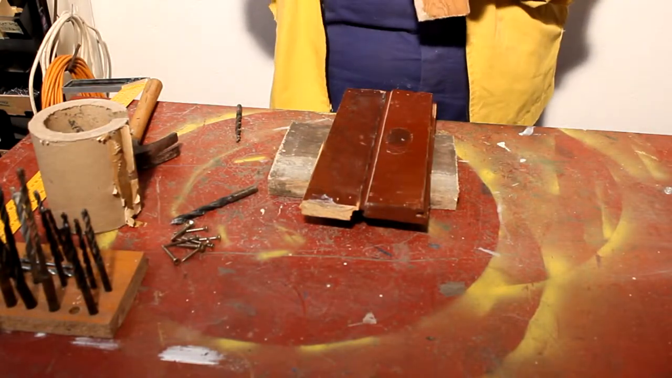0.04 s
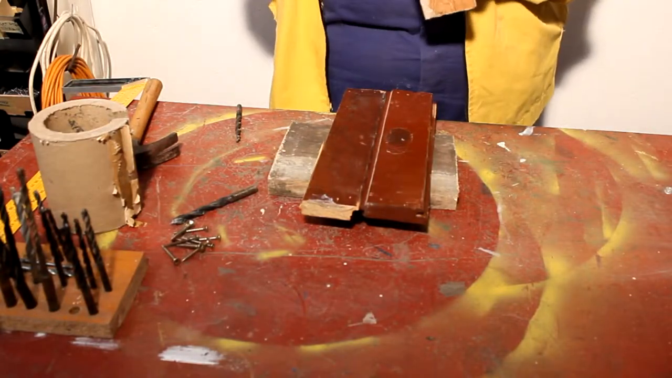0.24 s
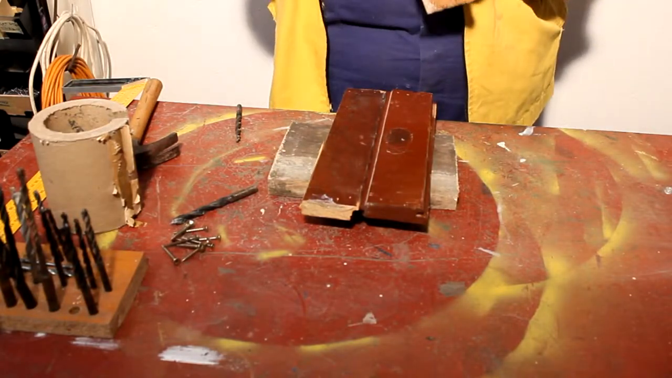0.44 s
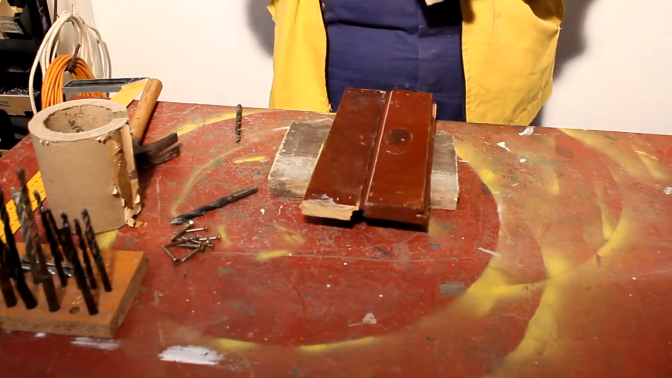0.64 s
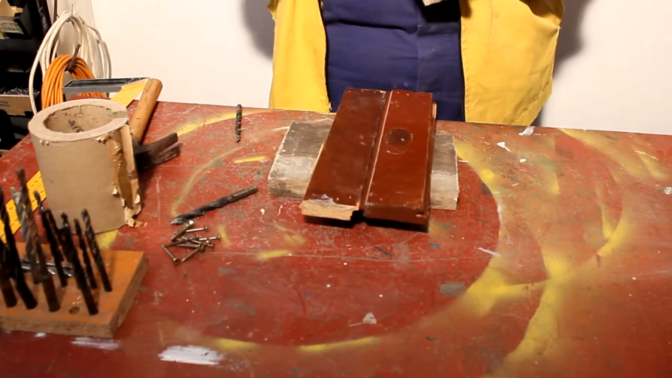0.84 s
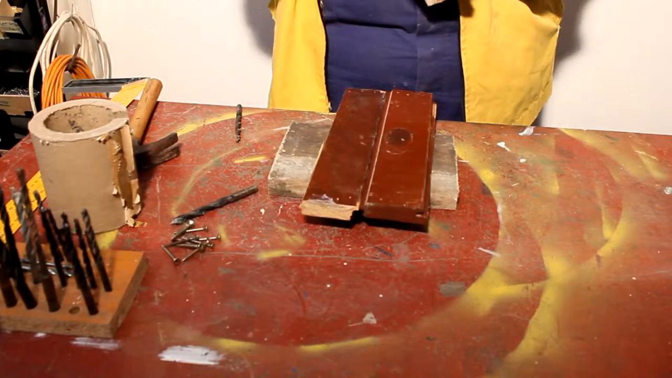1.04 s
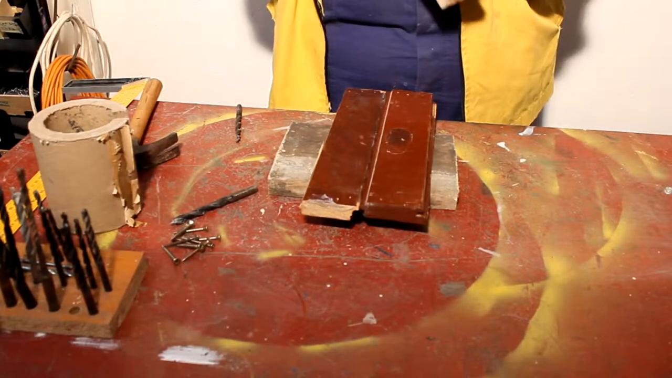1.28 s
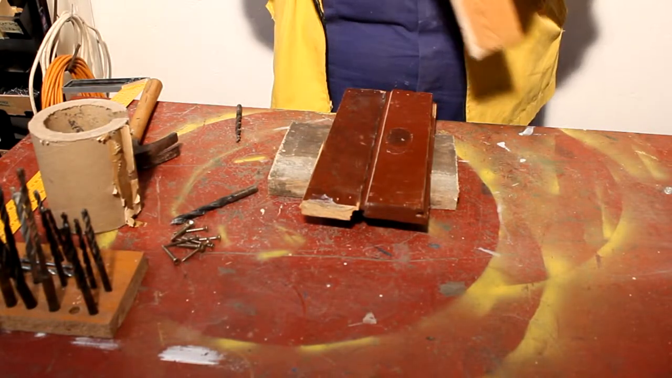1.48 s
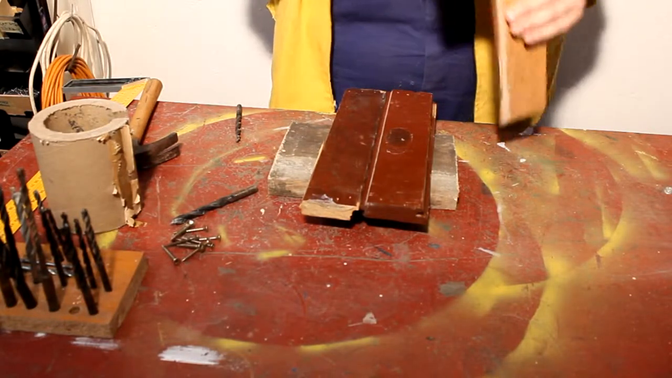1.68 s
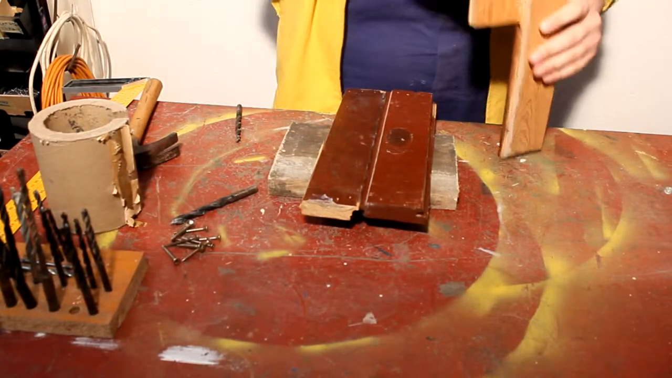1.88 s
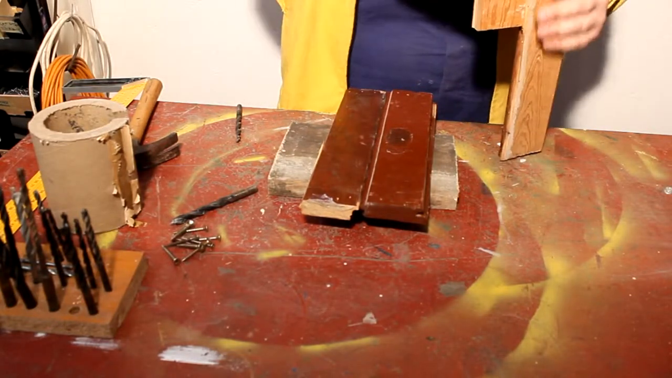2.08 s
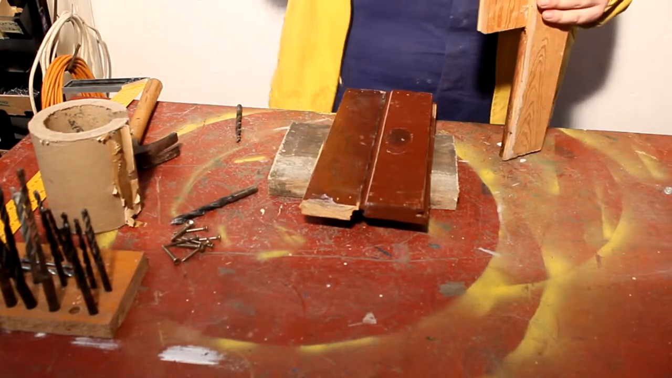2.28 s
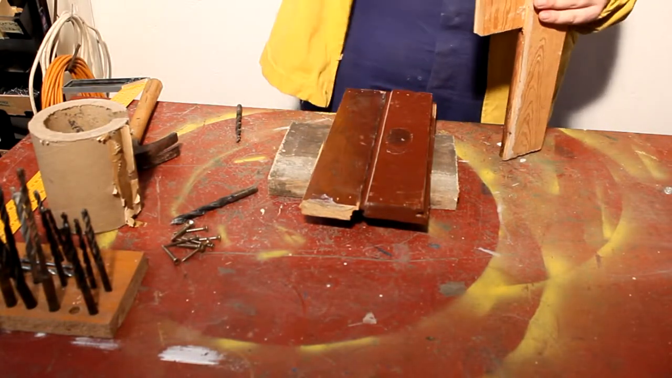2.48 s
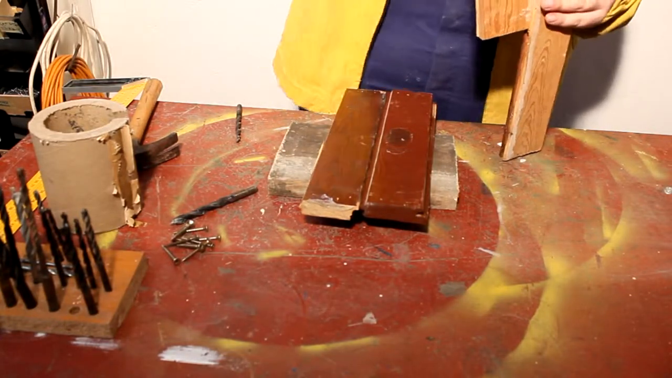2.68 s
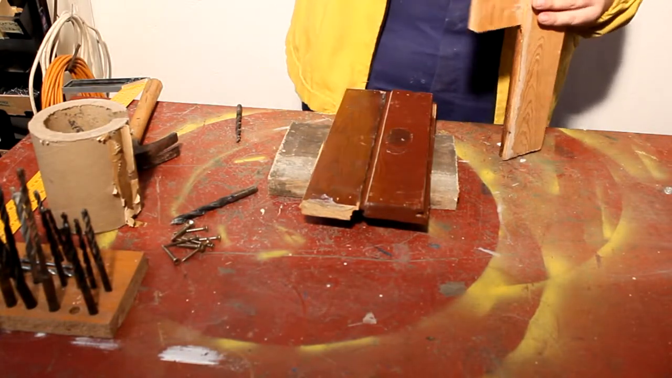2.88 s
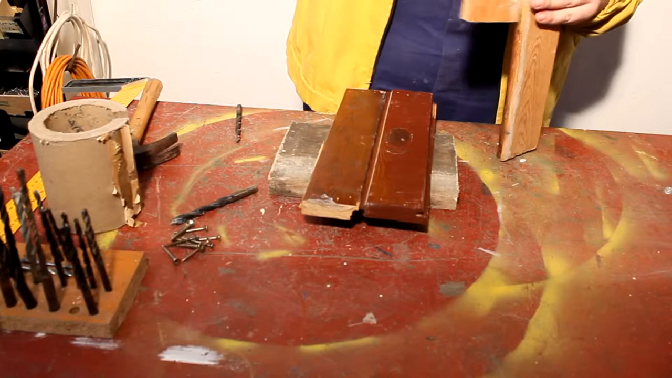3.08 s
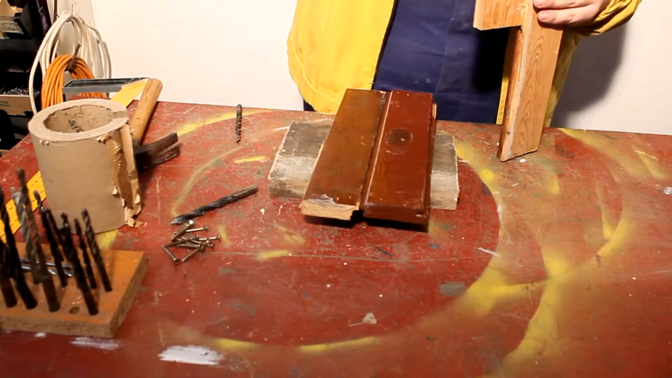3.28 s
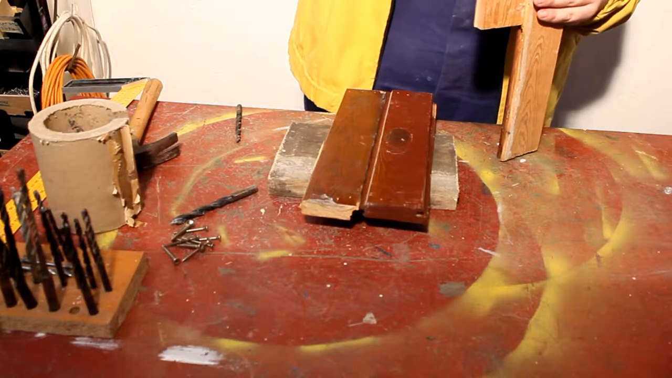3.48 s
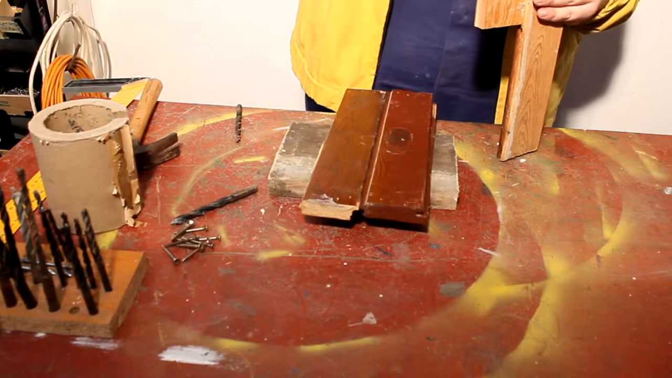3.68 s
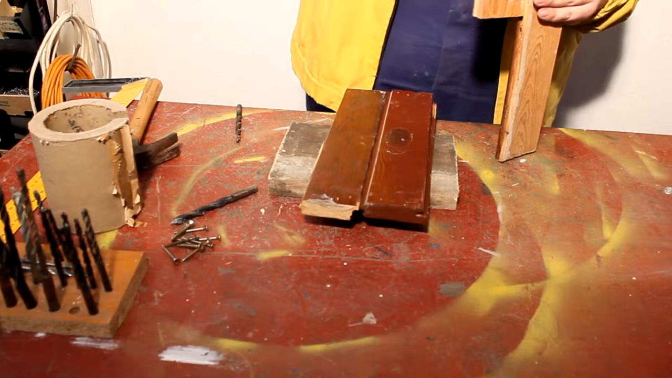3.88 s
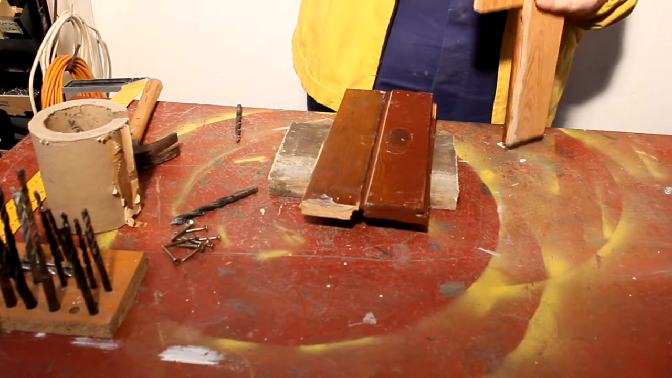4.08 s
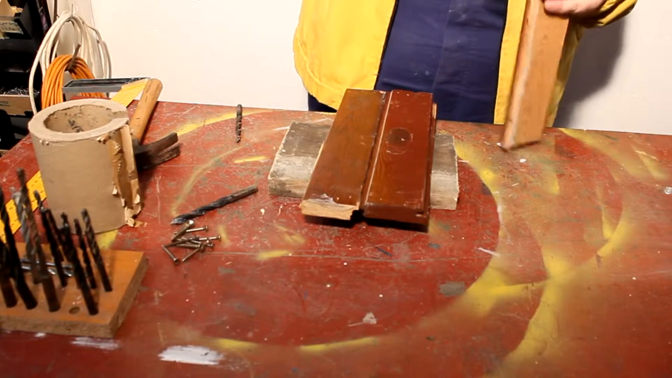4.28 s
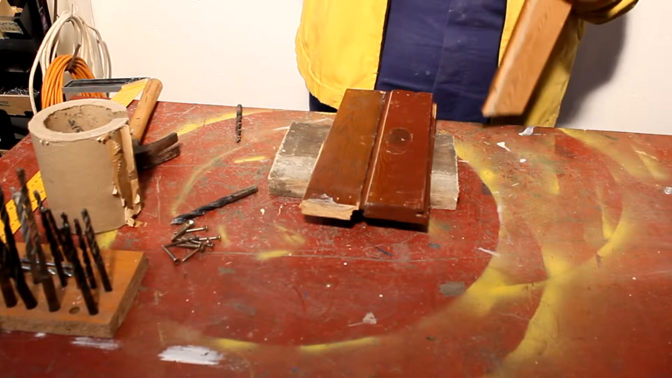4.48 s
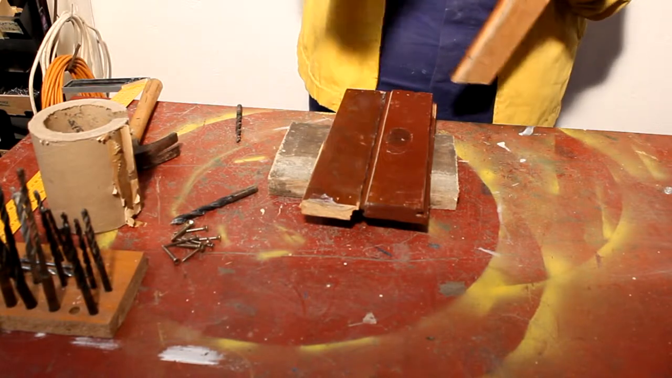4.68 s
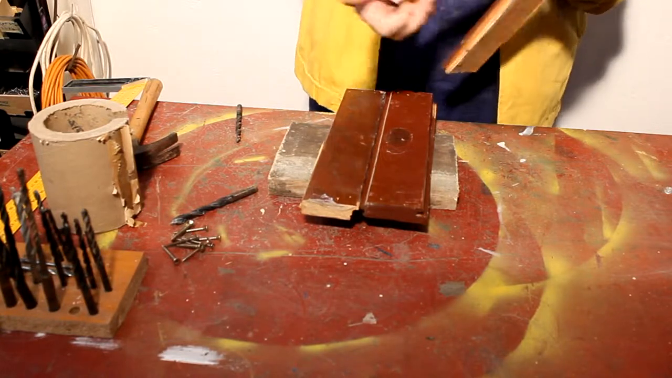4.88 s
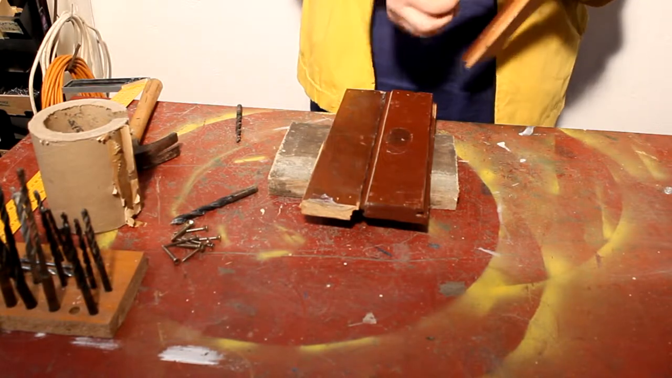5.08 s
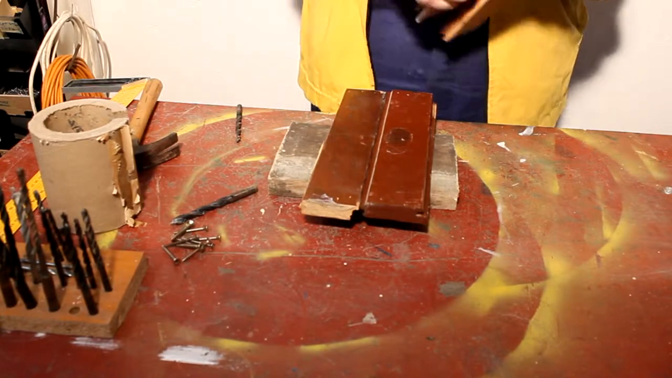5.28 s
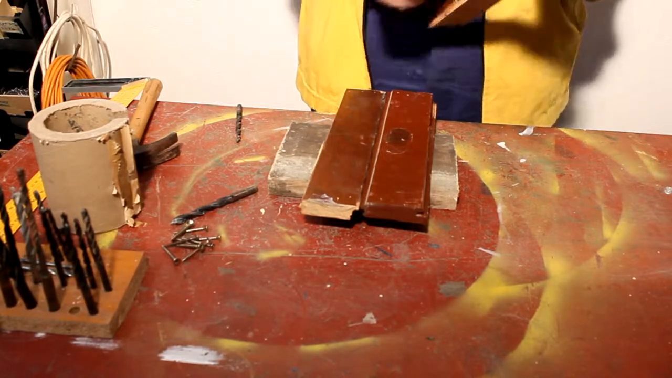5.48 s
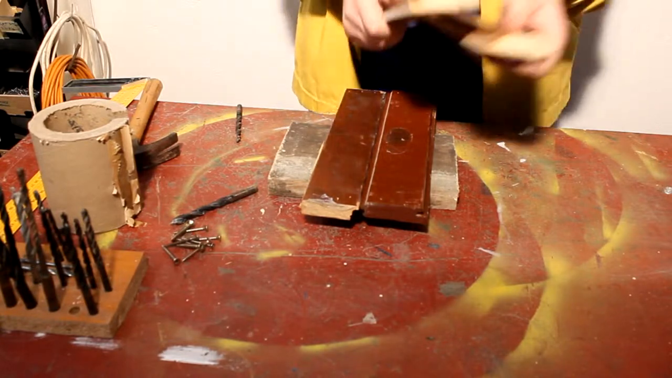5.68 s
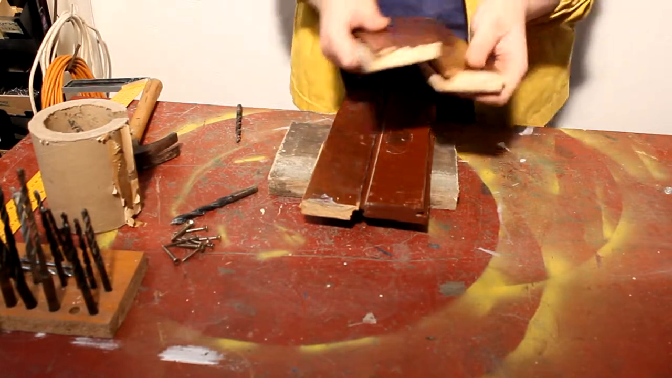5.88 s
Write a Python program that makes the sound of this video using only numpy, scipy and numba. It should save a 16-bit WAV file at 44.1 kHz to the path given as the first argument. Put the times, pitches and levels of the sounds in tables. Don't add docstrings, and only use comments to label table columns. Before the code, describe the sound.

A small, hard, reverberant workshop heard through a camera microphone with quiet room hiss and a faint high whine. From 0 to 0.7 s two narrow boards rub in short, gritty stick-slip scrapes, strongest near 0.55 s. Light edge taps and tiny bumps follow at 0.9-1.4 s, with stiff jacket rustle from 1.3 s. At 2.0 s a board end strikes the bench: a very loud, clipped bang, booming top, rattling loose tools and a room tail. From 2.6 to 3.4 s come clustered wooden clicks, short rubs and dull bumps, growing heavier towards 3.2-3.4 s. Two more hard blows land at 3.9 and 4.27 s, the first with little rattle, the second shaking tools and leaving a thin high steel ring. A lesser knock at 4.83 s leads into light rubbing, ticks and rustle; from 5.5 s a far machine swells in, under crisp knocks around 5.8 s.

```python
import sys
import numpy as np
from scipy import signal
from scipy.fft import rfft, irfft
from scipy.io import wavfile
from scipy.ndimage import uniform_filter1d
from numba import njit

SR = 44100
rng = np.random.default_rng(int(sys.argv[2]) if len(sys.argv) > 2 else 0)


def wav_out(sig):
    wavfile.write(sys.argv[1], SR, np.round(np.clip(np.atleast_2d(sig).T, -1, 1) * 32767).astype(np.int16))


def ratio_of_db(decibels):
    return 10 ** (np.asarray(decibels, float) / 20)


N = 262042
TIME = np.arange(N) / SR


def unit(x):
    return x / np.sqrt(np.mean(x ** 2))


def colour(x, points):
    hz, db = np.transpose(points)
    bin_hz = np.arange(1025) * SR / 2048 + 1
    log_gain = np.interp(np.log(bin_hz), np.log(hz), db) * np.log(10) / 20
    cepstrum = irfft(log_gain)
    cepstrum[1:1024] *= 2
    cepstrum[1025:] = 0
    return signal.fftconvolve(x, irfft(np.exp(rfft(cepstrum))))[:len(x)]


def walk(rate):
    hold = int(SR / rate)
    levels = np.repeat(rng.standard_normal(N // hold + 1), hold)
    return unit(uniform_filter1d(levels, hold)[:N])


def ring(modes, spread_db, detune, length=8192):
    hz, db, t60 = np.transpose(modes)[:, :, None]
    chance = rng.standard_normal((2, len(modes), 1))
    t = TIME[:length]
    decay = ratio_of_db(db + spread_db * chance[0] - 60 * t / t60)
    return decay * np.sin(2 * np.pi * hz * (1 + detune * chance[1]) * t)


def add(out, s, x):
    i = int(s * SR)
    out[i:i + len(x)] += x[:N - i]


def grains(rate, spread_db):
    hits = rng.random(N) < rate / SR
    return unit(hits * rng.standard_normal(N) * ratio_of_db(spread_db * rng.exponential(size=N)))


def strokes(rows, touch_db_per_s):
    lift_db, lift_s, fade_db_per_s = 12.5, 0.019, 176.5
    s, length, db, swell_db = np.transpose(rows)[:4, :, None]
    t = TIME[::64] - s
    after = np.clip(t - length, 0, None)
    swell = swell_db * np.clip(1 - t / length, 0, 1)
    touch = touch_db_per_s * np.clip(t, None, 0)
    return db - swell + touch - lift_db * np.clip(after / lift_s, 0, 1) - fade_db_per_s * after


# (frequency [Hz], density [dB per Hz])
FLOOR_SPECTRUM = [(15, -34), (25, -20), (180, -8.5), (249, -5), (516, -3.5), (911, -11), (1130, -6),
                  (2050, -11.5), (4740, -13.5), (11000, -23.5), (14400, -21.5), (16000, -35)]
# (frequency [Hz], level [dB])
MACHINE_TONES = [(64.6, -55), (134.6, -52), (807.5, -46), (1416, -54), (1637, -48)]
# (time [s], level [dB])
MACHINE_SWELL = [
    (4.9, -17),
    (5.35, -16),
    (5.55, -4),
    (5.94, 2),
]


def background():
    floor_db, whine_hz, whine_width_hz, whine_db = -55, 14160, 350, -68
    hiss = ratio_of_db(floor_db + 0.65 * walk(1.7)) * unit(colour(rng.standard_normal(N), FLOOR_SPECTRUM))
    pole = np.exp(2j * np.pi * whine_hz / SR - np.pi * whine_width_hz / SR)
    whine = ratio_of_db(whine_db) * unit(signal.lfilter([1], [1, -pole], rng.standard_normal(N)).imag)
    machine = np.zeros(N)
    for hz, db in MACHINE_TONES:
        speed = 1 + 0.05 * (TIME - 5.65) + 0.0071 * walk(45)
        level = ratio_of_db(db - 6 + 2 * walk(35))
        machine += level * np.sin(2 * np.pi * hz * np.cumsum(speed) / SR)
    swell = ratio_of_db(np.interp(TIME, *np.transpose(MACHINE_SWELL), left=-60))
    return hiss + whine + swell * machine


# (frequency [Hz], t60 [s])
ROOM_DECAY = [(100, 0.31), (260, 0.71), (700, 0.49), (1800, 0.43), (4800, 0.35), (9000, 0.27),
              (14000, 0.25)]


def room(x):
    t, tail = TIME[:SR], 0
    table_hz, table_t60 = np.transpose(ROOM_DECAY)
    for hz in 60 * 2 ** np.arange(0, 8.4, 0.5):
        half_octave = [hz / 2 ** 0.25, hz * 2 ** 0.25]
        band = signal.butter(2, half_octave, "band", fs=SR, output="sos")
        t60 = np.interp(np.log(hz), np.log(table_hz), table_t60)
        tail = tail + signal.sosfilt(band, rng.standard_normal(SR)) * ratio_of_db(-60 * t / t60)
    tail = tail * np.clip((t - 0.003) / 0.0033, 0, 1)
    return signal.fftconvolve(x, tail)[:N]


def rumble():
    level_db, t60_s = -49.5, 1.87
    energy = np.zeros(N)
    for s, db, *_ in HARD_BLOWS + SOFT_BUMPS:
        add(energy, s, ratio_of_db(2 * (db - 60 * TIME[:2 * SR] / t60_s)))
    band = signal.butter(2, [50, 150], "band", fs=SR, output="sos")
    return ratio_of_db(level_db) * energy ** 0.47 * unit(signal.sosfilt(band, rng.standard_normal(N)))


# (start [s], length [s], level at the end [dB], swell [dB])
ARM_MOVES = [
    (1.3, 0.078, -48, 8),
    (1.405, 0.15, -46, 0.5),
    (1.59, 0.23, -49, -5.5),
    (1.85, 0.18, -54.5, 0),
    (2.28, 0.28, -50, -12.5),
    (3.0, 0.42, -51, 1),
    (4.62, 0.22, -47.5, 3.5),
    (4.96, .45, -51.5, 1.5),
    (5.46, .3, -49, 4),
]
# (frequency [Hz], density [dB per Hz])
CLOTH_SPECTRUM = [(88, 10.5), (150, -25), (264, 1.5), (414, -5.5), (1120, -3), (1390, -6.5), (2140, -4),
                  (7770, -13.5), (16000, -35.5)]


def jacket():
    db = strokes(ARM_MOVES, touch_db_per_s=303).max(0)
    db = uniform_filter1d(np.repeat(db, 64)[:N], 256)
    return ratio_of_db(db + walk(15)) * unit(colour(grains(13000, 1.1), CLOTH_SPECTRUM))


# (start [s], length [s], level at the end [dB], swell [dB], grit [dB])
BOARD_STROKES = [(0, 0.048, -44, -11, -18), (0.057, 0.035, -34.5, 4.5, -7), (0.085, 0.045, -40.5, -6.5, -5),
                 (0.137, 0.051, -34, 4.5, -4), (0.312, .025, -37, 3.5, 3), (.343, 0.042, -35.5, -2, 1.5),
                 (0.401, 0.026, -33.5, -3.5, 5.5), (.434, 0.012, -29.5, 5.5, 8.5),
                 (0.456, 0.037, -42, -1.5, -7), (0.522, 0.032, -26.5, 8.5, 4),
                 (0.555, 0.038, -19.5, 7, -1.5), (0.594, 0.039, -24, -3, 2), (0.646, 0.073, -43, -5, -13),
                 (3.819, 0.037, -39.5, 11.5, 5.5), (3.858, 0.052, -50.5, -10, -1),
                 (4.203, .065, -26, 4, -3), (2.74, 0.058, -55, -4, 3), (2.914, .05, -41, -3.5, -4),
                 (2.977, .09, -51, -3, -3), (3.09, 0.073, -41.5, 8, -5), (3.197, 0.082, -48.5, -4, 0.5),
                 (3.294, 0.055, -38, 7.5, 1.5)]
# (start [s], length [s], level at the end [dB], swell [dB], grit [dB])
LIGHT_RUBS = [
    (2.62, 0.049, -36, 10, -11),
    (1.3, 0.053, -55, 7, 5),
    (1.975, .03, -48, 6, -10),
    (4.85, 0.12, -38, -2.5, -8),
    (4.959, 0.087, -46.5, 3, -8),
    (5.09, .09, -48.5, 1, 0.5),
    (5.19, 0.032, -38, 1.5, -1),
    (5.235, 0.14, -35.5, 7, -8),
    (5.37, 0.083, -48.5, -11, -16.5),
    (5.83, 0.086, -46.5, -12.5, -12),
]
# (frequency [Hz], level [dB], t60 [s])
FIRST_BOARD = [(1171, -5.5, 0.11), (2785, -1, 0.059), (3807, -4, 0.046), (4610, -4, 0.018),
               (5570, -9, 0.073), (5990, -15.5, 0.067), (6760, -13, 0.035), (7700, -17, 0.053),
               (9000, -43, 0.026)]
# (frequency [Hz], level [dB], t60 [s])
SECOND_BOARD = [(1105.6, -1, 0.094), (2533, -1.5, 0.076), (2680, -1, 0.034), (3690, -13, 0.1),
                (4290, -17, 0.11), (4930, -7, 0.029), (6370, -17.5, 0.05), (8150, -32, 0.007),
                (8200, -38, 0.011)]
# (frequency [Hz], density [dB per Hz])
GRIT_SPECTRUM = [(700, -42.5), (1200, 1), (2000, -23), (2800, 2), (4800, 0.5), (7000, -1), (9000, -8),
                 (11000, -17.5), (16000, -10.5)]


def slides():
    slide_share, rub_share = 0.19, 0.35
    rows = BOARD_STROKES + LIGHT_RUBS
    levels = strokes(rows, touch_db_per_s=2500)
    lead = levels.argmax(0)
    control = [levels.max(0), np.array(rows)[lead, 4], lead >= len(BOARD_STROKES)]
    db, grit_db, light = uniform_filter1d(np.repeat(control, 64, axis=1)[:, :N], 128)
    low_db = -5.5 - 0.08 * (np.clip(db, -50, 0) + 26.5) + 5 * light
    share = np.clip(slide_share + (rub_share - slide_share) * light + 0.29 * walk(10), 0, 1)
    slip = ratio_of_db(db) * grains(12000, 1.2) * ratio_of_db(walk(90))

    low, high = 0, 0
    for board, weight in ((FIRST_BOARD, 1 - share), (SECOND_BOARD, share)):
        for k, (hz, mode_db, t60) in enumerate(board):
            held_t60 = 0.36 * t60
            pole = np.exp(2j * np.pi * hz / SR - np.log(1000) / (held_t60 * SR))
            zeros = np.array([1, 0, -1]) * np.sqrt(0.5 - 0.5 * abs(pole) ** 2)
            drive = slip * weight * ratio_of_db(2.8 * walk(13))
            mode = signal.lfilter(zeros, [1, -2 * pole.real, abs(pole) ** 2], drive)
            if k == 0:
                low = low + mode
            else:
                high = high + ratio_of_db(mode_db) * mode

    hiss_hz, hiss_width_hz = 7200, 2600
    drag_hz, drag_width_hz = 950, 1900
    hiss = signal.lfilter(*signal.iirpeak(hiss_hz, hiss_hz / hiss_width_hz, SR), slip)
    drag = signal.lfilter(*signal.iirpeak(drag_hz, drag_hz / drag_width_hz, SR), slip)
    grit_filter = colour(np.eye(1, 512)[0], GRIT_SPECTRUM)
    grit = np.convolve(slip, grit_filter / np.linalg.norm(grit_filter))[:N]
    out = ratio_of_db(-8.5) * drag + ratio_of_db(-10 + 2.4 * grit_db) * hiss
    out += ratio_of_db(-5.5) * high + ratio_of_db(low_db - 8) * low
    return out + ratio_of_db(np.minimum(grit_db, 1) - 4.5) * grit


# (time [s], level [dB], lowest mode [dB], snap [dB], share of the second board [0-1])
FIRM_TAPS = [(.8970, -34.5, -25, 6, .7), (1.1885, -43, -5, -7, 0.27), (2.5746, -30, -20, 1.5, 0),
             (2.6040, -24.5, -20, 6.5, 0), (2.7364, -28.5, -25, 14.5, 0), (2.9043, -24.5, -14, -3, .2),
             (2.9097, -23, -22, 12, 0.1), (3.740, -48, -11, -2, 0.5), (4.8331, -11.5, -7, -14, 0.88),
             (5.7738, -21, 12.5, -2, 1), (5.8152, -15.5, -11, -1.5, 0.13), (5.8166, -22.5, -3, 6, 0.36),
             (5.8780, -26.5, -9, 2.5, .1)]
# (time [s], level [dB], snap [dB])
EDGE_TICKS = [(0.312, -45, -1), (.3141, -48, 5), (.3179, -42, 8), (.3251, -45, 6), (0.3284, -45, 8),
              (.868, -43, 4), (0.879, -45, 1), (1.385, -53, -3), (2.259, -36, 9), (2.268, -38, 6),
              (2.325, -43, 10), (2.952, -29.5, 1), (2.982, -27.5, 5.5), (3.144, -30, -2), (3.190, -37.5, 4),
              (3.315, -43, 9.5), (3.356, -41, 10), (3.991, -38.5, 16.5), (4.1795, -41.5, 5),
              (4.915, -32, 7), (4.926, -39, 7), (4.952, -36, 9), (5.1892, -31.5, 2), (5.219, -30.5, -1)]
# (frequency [Hz], density [dB per Hz])
SNAP_SPECTRUM = [(1500, -40), (3500, -7), (6500, -6.5), (9500, -14), (16000, -23)]


def taps():
    tick_low_db, tick_share = -29, 0.28
    ticks = [(s, db, tick_low_db, snap_db, tick_share) for s, db, snap_db in EDGE_TICKS]
    out, t = np.zeros(N), TIME[:8192]
    for s, db, low_db, snap_db, share in FIRM_TAPS + ticks:
        share = np.clip(share, 0, 1)
        modes = (1 - share) * ring(FIRST_BOARD, 2.2, 0.018) + share * ring(SECOND_BOARD, 4.2, 0.0092)
        low = modes[0] * (1 - np.exp(-t / 0.0022))
        crackle = rng.standard_normal(8192) * ratio_of_db(-60 * t / 0.0066)
        snap = colour(4 * (t == 0) + crackle, SNAP_SPECTRUM) * ratio_of_db(6.5)
        blur = unit(colour(rng.standard_normal(8192), GRIT_SPECTRUM)) * ratio_of_db(-60 * t / 0.044)
        tap = ratio_of_db(-5) * modes[1:].sum(0) + ratio_of_db(low_db + 8) * low
        tap += ratio_of_db(snap_db + 4.5) * snap + ratio_of_db(-10) * blur
        add(out, s, ratio_of_db(db) * tap)
    return out


# (time [s], level in the room [dB], contact [ms], rattle [dB], direct boom [dB])
HARD_BLOWS = [
    (2.007, 8, 0.65, -2.5, 2.5),
    (3.9224, 2.5, 0.58, -19.5, -12),
    (4.2715, 3.5, 0.59, 3, 7),
    (4.832, -28, 0.2, 0.5, 3),
    (5.775, -30.5, 0.09, -2, 3.5),
    (5.818, -28, 0.17, -6, 1),
]
# (time [s], level [dB], contact [ms], rattle [dB])
SOFT_BUMPS = [(.635, -30.5, 0.42, -27), (1.049, -33, 3.2, -33), (1.192, -35, 1.5, -29),
              (1.408, -26.5, 2.2, -32), (1.44, -31, 2, -31), (1.718, -36, 1.2, -30.5),
              (2.669, -17, 1.9, -20.5), (2.68, -12, 3.3, -46), (2.707, -19, 0.95, -29),
              (2.736, -20.5, 1.5, -18.5), (2.91, -21.5, 2.1, -22), (2.96, -20.5, 1.6, -21),
              (2.995, -18.5, 1.86, -25.5), (3.151, -16.5, 1.9, -20), (3.162, -8.5, 0.79, -37),
              (3.170, -5, 2.16, -28), (3.199, -5.5, 1.9, -33.5), (3.359, -0.5, 3.64, -45.5),
              (3.368, -16, 0.87, -38), (5.387, -30.5, 1.6, -18.5)]
# (frequency [Hz], level [dB], t60 [s])
BENCH_MODES = [(167, -27, 0.21), (244, -8, 0.35), (266.5, -23.5, 0.46), (329, -3.5, 0.38), (404, 2, 0.11),
               (478, 9, 0.068), (581.6, -4.5, 0.24), (670, 14, 0.053), (810, 6, 0.074), (982, 7.5, 0.094),
               (1155, 5, 0.15), (1270, 11.5, 0.022), (1650, -57, .035), (2130, -21, .03)]
# (frequency [Hz], level [dB], t60 [s])
THUMP_MODES = [(236.3, -7.5, 0.23), (263, -3, 0.18)]
# (frequency [Hz], density [dB per Hz])
RATTLE_SPECTRUM = [(880, -38), (1500, -3.5), (1640, 4), (2210, -4), (2510, -11), (6240, -4.5), (9950, -17),
                   (16000, -71.5)]
# (frequency [Hz], density [dB per Hz])
THROW_SPECTRUM = [(100, -21), (210, -3.5), (400, -3), (680, 0.5), (1400, -1), (3000, -2.5), (6200, -3.5),
                  (9500, -16.5), (16000, -35.5)]


def blows():
    bump_boom_db = -8
    out, feed, t = np.zeros(N), np.zeros(N), TIME[:8192]
    thrown = colour(np.eye(1, 1024)[0], THROW_SPECTRUM)
    for s, db, contact_ms, rattle_db, boom_db in HARD_BLOWS + [(*row, bump_boom_db) for row in SOFT_BUMPS]:
        push = TIME[:256] * np.exp(-TIME[:256] / (contact_ms / 5000))
        push = push / push.sum()
        late = np.clip(t - 0.0015, 0, 1)
        rattle = unit(colour(rng.standard_normal(8192), RATTLE_SPECTRUM))
        rattle = rattle * (late > 0) * ratio_of_db(-60 * late / 0.025)
        boom = np.convolve(ring(BENCH_MODES, 2.6, 0.024).sum(0), push)[:8192]
        add(out, s, ratio_of_db(db) * (ratio_of_db(boom_db - 14) * boom + ratio_of_db(rattle_db + 5) * rattle))
        thump = ring(THUMP_MODES, 1.5, 0.024).sum(0) * (1 - np.exp(-t / 0.0073))
        add(out, s, ratio_of_db(db - 15) * min(contact_ms / 2, 1) ** 2 * thump)
        add(feed, s, ratio_of_db(db) * (np.convolve(thrown, push)[:1024] + ratio_of_db(rattle_db + 6) * thrown))
    tool = ring([(4480, -38, 1.4)], 0, 0, length=N)[0]
    add(out, 4.272, tool * ratio_of_db(-2 * abs(2 * walk(61))))
    return out, feed


def scene():
    near = slides() + taps() + jacket()
    bench, feed = blows()
    heard = near + bench + room(ratio_of_db(-38.5) * near + feed)
    bass_cut = signal.butter(4, 160, "high", fs=SR, output="sos")
    return (signal.sosfilt(bass_cut, heard) + rumble() + background())[None]


@njit
def limiter(x, top, attack, release, slope):
    y, envelope = np.empty(len(x)), 0.
    for i in range(len(x)):
        envelope += (abs(x[i]) - envelope) * (attack if abs(x[i]) > envelope else release)
        y[i] = x[i] * (top / max(envelope, top)) ** slope
    return y


def roll_off(x):
    return signal.sosfilt(signal.butter(12, 16390, fs=SR, output="sos"), x)


def record(dry):
    x = limiter(dry[0], ratio_of_db(-4), 1 / (0.0025 * SR), 1 / (0.052 * SR), 0.99)
    drive = uniform_filter1d(dry[0] ** 2, 256, origin=127)
    x = x + ratio_of_db(-37) * drive / (drive + 0.3) * rng.standard_normal(N)
    x = signal.sosfilt(signal.butter(2, 75, "high", fs=SR, output="sos"), x)
    return roll_off(np.clip(x, -1, 1)[None])


dry = scene()
out = record(dry)
wav_out(out)
```